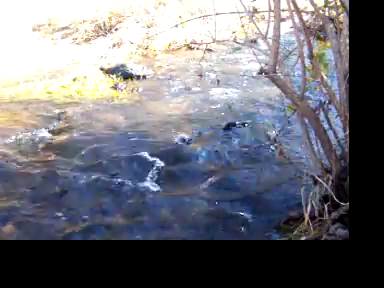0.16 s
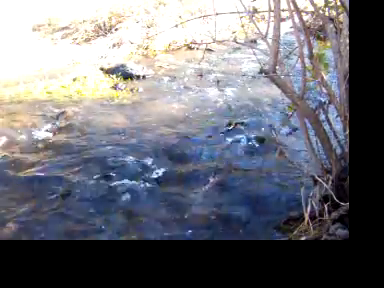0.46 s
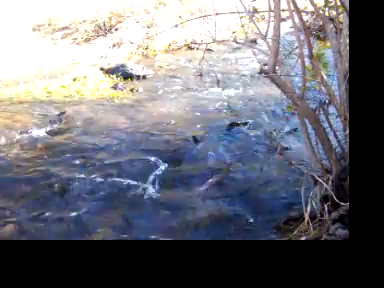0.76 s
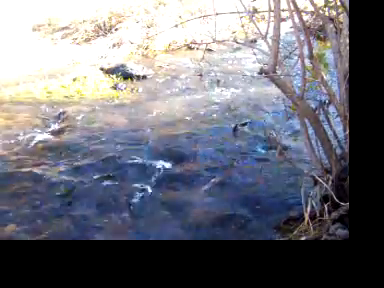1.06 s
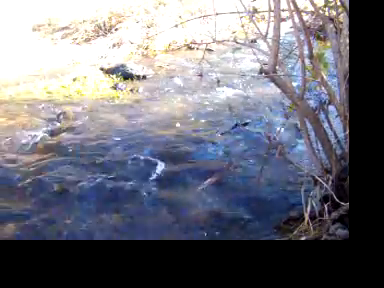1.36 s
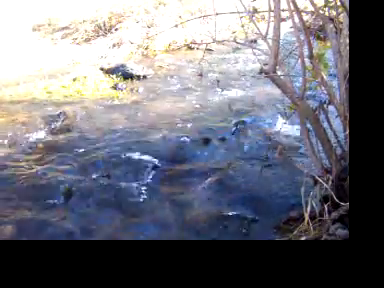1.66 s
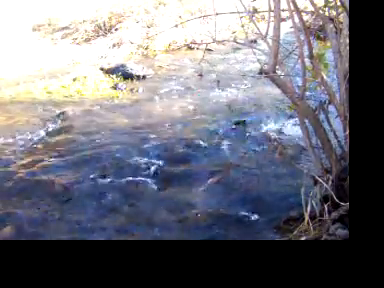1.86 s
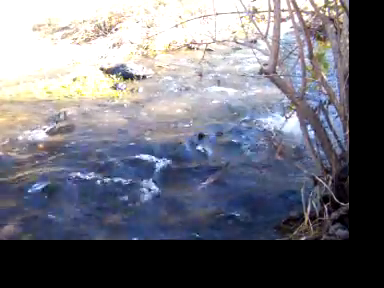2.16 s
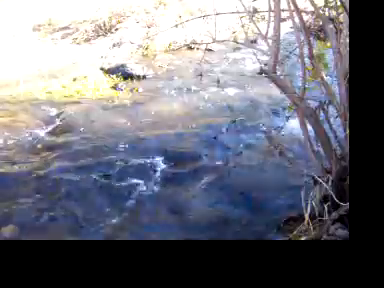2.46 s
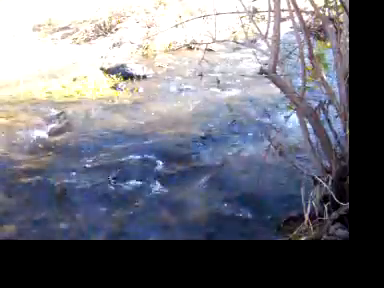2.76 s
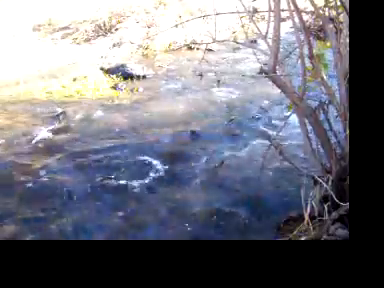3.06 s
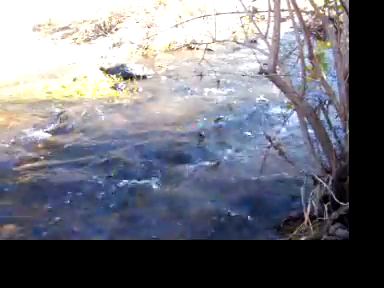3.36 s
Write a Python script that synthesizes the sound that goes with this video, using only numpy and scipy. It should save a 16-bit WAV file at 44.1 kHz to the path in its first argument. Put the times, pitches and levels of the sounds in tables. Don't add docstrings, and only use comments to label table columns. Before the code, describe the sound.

A shallow stream rushes steadily throughout, a dense fizz of tiny bubbles over a softer low wash, outdoors and very close. Until 1.3 s only fine spray ticks and a few chirps stand out. Small blips thicken around 1.5 s; a plop at 1.7 and a sharp tick at 1.8 lead to a deep plop and rising gulp at 1.9. Gurgles and plops continue to 2.6, then grow sparser; loud hits briefly duck the rush.

```python
import sys
import numpy as np
from scipy import signal
from scipy.fft import rfft, irfft
from scipy.io import wavfile
from scipy.ndimage import uniform_filter1d

SR = 44100
rng = np.random.default_rng(int(sys.argv[2]) if len(sys.argv) > 2 else 0)


def invert_db(level):
    return 10 ** (np.asarray(level, dtype=float) / 20)


def put_to_file(sound):
    columns = np.atleast_2d(sound).T
    safe = np.clip(columns, -1, 1)
    whole_steps = np.round(safe * 32767)
    wavfile.write(sys.argv[1], SR, whole_steps.astype(np.int16))


N = 154791

# f/Hz, level/dB
BODY_COLOUR = [(18, -16.5), (60, -10.5), (110, -6.5), (150, -9.5), (370, -6), (540, -6.5), (635, -1),
               (740, -8.5), (1050, -15), (1400, -29), (2300, -90)]
# f/Hz, level/dB
FIZZ_COLOUR = [(620, -21), (1050, -8.5), (1210, -3), (1560, -3), (2890, -4.5), (4940, -3), (7000, -7.5),
               (8080, -19), (8920, -36.5), (11600, -77.5), (19600, -120)]
# t/s, level/dB
STONE_CHURN = [(0.0, -23.5), (0.03, -24), (0.48, -24), (0.51, -21.5), (0.52, -25.5), (1.3, -24),
               (1.31, -22.5), (1.47, -24), (1.5, -22), (1.75, -22), (1.83, -13), (1.84, -20), (1.93, -21.5),
               (3.09, -21.5), (3.1, -23), (3.35, -19), (3.44, -25.5), (3.51, -18.5)]
# centre t/s, boost/dB, half length/s
SPLASH_SWELLS = [(1.326, 3, 0.013), (1.51, 5.5, 0.015), (1.562, 6, 0.0066), (1.619, 3, 0.012),
                 (1.718, 1.5, 0.013), (1.915, 8, 0.0099), (2.113, 5, 0.0086), (2.17, 2.5, 0.014),
                 (2.277, 4.5, 0.012), (2.412, 2.5, 0.017), (2.722, 3.5, 0.012), (3.078, 3.5, 0.014),
                 (3.335, 2, 0.025)]
# t/s, peak level/dB, f/Hz, ring/cycles
NEAR_SPRAY = [(0.1476, -11, 4220, 4), (0.1999, -9, 4380, 4), (0.3105, -12, 4800, 4), (0.4025, -10, 5330, 5),
              (0.4155, -11, 4200, 6), (0.4265, -13, 5700, 4), (0.4806, -9, 7000, 2), (0.5118, -11, 4700, 3),
              (0.5775, -13, 6500, 3), (0.6988, -10, 4270, 4), (0.839, -12, 4290, 4), (1.0128, -6, 4900, 4),
              (1.0145, -9, 4900, 5), (1.0545, -13, 4300, 4), (1.3075, -8, 6600, 4), (1.3362, -7, 6200, 4),
              (1.3987, -11, 3020, 3), (1.4135, -9, 6100, 4), (1.479, -11, 4910, 4), (1.4965, -9, 3890, 4),
              (1.6177, -11, 5010, 3), (1.7379, -12, 4470, 4), (1.9111, -10, 4730, 4),
              (2.0268, -11, 4420, 4), (2.1086, -11, 5270, 4), (2.1625, -12, 5940, 4),
              (2.5945, -11, 5600, 3), (2.9946, -12, 3350, 4), (3.3608, -9, 4300, 8), (3.364, -11, 3500, 7),
              (3.383, -12, 7200, 6), (3.457, -11, 4730, 4)]
# t/s, peak level/dB, f/Hz, ring/cycles, pitch rise/share
RISING_CHIRPS = [(0.349, -12, 4700, 24, .06), (1.506, -14, 1400, 9, .12), (1.527, -13, 1300, 9, .14),
                 (1.540, -15, 2500, 10, .12), (1.565, -16, 1950, 7, .05), (1.594, -17, 1600, 8, .06),
                 (1.604, -17, 1550, 10, .03), (1.621, -15, 2800, 12, .06), (1.630, -20, 2100, 12, .1),
                 (1.704, -16, 2300, 16, .1), (1.478, -20, 1900, 8, .03), (1.020, -15, 3100, 9, .06),
                 (1.3695, -15, 2000, 8, .04), (1.339, -14, 3300, 12, .15), (2.410, -7, 3150, 14, .02),
                 (2.103, -14, 520, 7, .14)]
# t/s, peak level/dB, f/Hz, ring/cycles
MIDDLE_BUBBLES = [(0.4804, -15.5, 1910, 7.1), (1.308, -16, 1990, 6.0), (1.3662, -7, 2600, 2.6),
                  (1.5115, -11, 1700, 4), (1.6192, -13, 1830, 4.2), (1.698, -15, 1550, 4.6),
                  (2.0198, -18, 1930, 5.2), (2.0523, -9.5, 1417, 4.8), (2.2662, -10, 2010, 1.8),
                  (2.623, -19, 1570, 6.0), (2.718, -13, 1330, 4.5), (2.783, -15, 1580, 6.0),
                  (2.9047, -13, 1480, 6.0), (3.259, -11.5, 1890, 7), (3.313, -15, 1710, 6.0)]
# t/s, peak level/dB, f/Hz, ring/cycles
DROPLETS = [(0.4806, -8, 4000, 1.8), (0.5077, -7, 6420, 4.2), (0.5075, -4.5, 4970, 3.8),
            (1.0096, -9, 5600, 5), (1.0507, -5.5, 4370, 4.2), (1.1746, -9.5, 3460, 4.2),
            (1.3362, -13, 2600, 3), (1.56, -12, 4840, 4.2), (1.7774, -11.5, 4320, 3.8),
            (1.7923, -5, 4570, 4.2), (1.8228, 5.5, 6210, 4.8), (1.8585, -8, 2780, 4.2),
            (2.2687, -8, 4660, 3.9), (2.2957, -9, 4220, 4.7), (2.6359, -9, 6380, 4.2),
            (2.6452, -1, 5600, 1.8), (3.03, -11.5, 4950, 4.2), (3.0667, -9, 5070, 4.2),
            (3.1857, -11, 4740, 4.2), (3.2926, -9, 4600, 2.5)]
# t/s, peak level/dB, f/Hz, ring/cycles, pitch rise/share
LARGE_POCKETS = [(0.881, -21.5, 302, 8.1, 0.035), (1.398, -19, 694, 2.1, .02),
                 (1.523, -19.5, 760, 5.9, .02), (1.714, -2.5, 660, 3, 0.016), (1.732, -13, 520, 6, 0.035),
                 (1.744, -12.5, 660, 9, 0.01), (1.907, -1, 330, 2.3, -0.024), (1.922, -12.5, 650, 13, .03),
                 (1.901, -14, 605, 4.4, .02), (2.065, -11, 445, 3.5, 0.0032), (2.086, -5.5, 390, 2.5, -.02),
                 (2.108, -13, 650, 5, 0.072), (2.123, -13.5, 640, 7, 0.06), (2.155, -13.5, 420, 6, -0.011),
                 (2.263, -16, 313, 2.6, 0.0053), (2.388, -14, 630, 6, 0.073),
                 (2.423, -7.5, 406, 3.5, 0.032), (2.602, -4.5, 370, 3.3, -0.0086),
                 (2.858, -18, 588, 9.8, .04), (2.948, -15, 600, 3.7, 0.0106),
                 (2.983, -18.5, 237.5, 6.8, 0.0094), (3.190, -14, 661, 9, 0.001), (3.275, -16, 700, 7, .01),
                 (3.472, -12.5, 790, 14, 0.054)]
# t/s, peak level/dB, f/Hz, ring/cycles
TRAILING_GURGLES = [(1.773, -22, 622, 8.6), (2.098, -15, 470, 3), (1.914, -10, 620, 6),
                    (1.963, -17, 270, 5), (1.955, -20, 820, 8), (1.925, -19, 460, 6), (2.190, -18, 660, 5),
                    (2.146, -22, 720, 9), (2.078, -18, 330, 3), (2.016, -21, 450, 5), (2.372, -16, 480, 4),
                    (2.355, -17.5, 660, 6), (2.29, -17, 190, 2), (1.560, -15, 2660, 3.3),
                    (1.867, -21, 776, 5), (1.814, -18, 700, 5.4), (2.099, -15, 230, 2.2),
                    (2.176, -16, 470, 3), (2.178, -19, 250, 4), (2.281, -18, 592, 6),
                    (2.286, -24.5, 167, 1.3), (2.438, -15, 630, 1.5), (2.471, -18, 444, 3.9),
                    (2.492, -22, 339, 3), (2.510, -18.5, 448, 6), (2.525, -21, 630, 6),
                    (2.622, -15, 373, 2.8), (2.755, -19, 600, 9.9), (2.900, -18.5, 679, 8.9),
                    (3.100, -23, 722, 15), (3.222, -22, 434, 6.7), (3.469, -16, 900, 4),
                    (2.731, -11.5, 1480, 7), (2.870, -17, 1760, 10), (3.345, -16, 1470, 9),
                    (1.6425, -12.5, 1560, 5.1)]

SMALL_RISE = 0.031
GULP_S = 1.926


def evened(x):
    return x / np.sqrt(np.mean(x ** 2) + 1e-20)


def colour(x, points):
    z = rfft(x)
    hz = np.fft.rfftfreq(len(x), 1 / SR)
    f, db = np.transpose(points)
    flat = np.sqrt(uniform_filter1d(abs(z) ** 2, size=201)) + 1e-9
    shape = invert_db(np.interp(np.log(hz + 1), np.log(f + 1), db, -90, -90))
    return evened(irfft(z / flat * shape, len(x)))


def flicker(per_s):
    smooth = uniform_filter1d(rng.standard_normal(N), int(SR / per_s))
    return evened(uniform_filter1d(smooth, int(SR / per_s / 2)))


def bubble(hz, cycles, rise):
    cycles = max(cycles, 0.4)
    u = np.arange(0, 2.5 * cycles / hz, 1 / SR) * hz / cycles * 2
    swell = (u * np.exp(1 - u)) ** 1.42
    pitch = np.minimum(hz * (1 + rise * (u - 1)), SR / 3)
    return swell * np.sin(2 * np.pi * np.cumsum(pitch) / SR)


def add(mix, s, sound):
    part = mix[round(s * SR):][:len(sound)]
    part += sound[:len(part)]


def bubbles(events, trim_db, stretch):
    layer = np.zeros(N)
    for s, db, hz, cycles, *own_rise in events:
        rise = own_rise[0] if own_rise else SMALL_RISE
        add(layer, s, invert_db(db + trim_db) * bubble(hz, cycles * stretch, rise))
    return layer


def cloud(lo_hz, hi_hz, per_s, spread_db, cycles, rise, clump_db, count):
    clumps = invert_db(clump_db * flicker(49.0))
    out = np.zeros(N)
    for hz in np.geomspace(lo_hz, hi_hz, count):
        popping = rng.random(N) < per_s / count / SR
        size_db = spread_db * np.minimum(rng.exponential(1, N), 5)
        sign = rng.choice([-1., 1.], N)
        pops = popping * invert_db(size_db) * sign
        out += signal.oaconvolve(pops * clumps, bubble(hz, cycles, rise))[:N] * np.sqrt(hz)
    return evened(out)


def rush():
    seconds = np.arange(N) / SR
    t, db = np.transpose(STONE_CHURN)
    churn_db = np.interp(seconds, t, db) + 24.5
    splash_db = sum(db * np.exp(-((seconds - s) / half) ** 2) for s, db, half in SPLASH_SWELLS)

    low = cloud(150, 1050, 400, 2.2, 5.5, .02, .8, count=16)
    low = low + invert_db(-6.5) * rng.standard_normal(N)
    low = low + invert_db(1.5) * colour(rng.standard_normal(N), BODY_COLOUR)

    high = cloud(1050, 6137, 2500, 1.94, 6.87, 0.022, 0.38, count=24)
    high = high + invert_db(4.0) * rng.standard_normal(N)
    high = high + invert_db(-2.0) * cloud(4450, 9160, 900, 1.9, 2.4, .02, 3.0, count=8)
    high = high + invert_db(-4.5) * cloud(7600, 9400, 600, 3.3, 4.5, .01, 4.5, count=4)

    body = invert_db(-27.5 + 0.19 * churn_db) * colour(low, BODY_COLOUR)
    fizz = invert_db(-25.2 + 0.67 * churn_db + splash_db) * colour(high, FIZZ_COLOUR)
    return body + fizz


def spray():
    return bubbles(NEAR_SPRAY, -4.0, 0.9)


def chirps():
    return bubbles(RISING_CHIRPS, -5.0, 0.85)


def middle_bubbles():
    return bubbles(MIDDLE_BUBBLES, -3.0, 1.4)


def droplets():
    return bubbles(DROPLETS, -3.0, 1.4)


def plops():
    return bubbles(LARGE_POCKETS, -2.5, 1.09)


def gurgles():
    return bubbles(TRAILING_GURGLES, -1.5, 0.92)


def gulp():
    length_s, start_hz, end_hz, bend = .061, 180, 560, 3.7
    u = np.arange(0, length_s, 1 / SR) / length_s
    turn = 2 * np.pi * np.cumsum(start_hz + (end_hz - start_hz) * u ** bend) / SR
    fades = np.minimum(1, np.minimum(u / 0.12, (1 - u) / 0.07))
    level = invert_db(-12.5 + 1.5 * (u - .5)) * fades
    return level * (np.sin(turn) + invert_db(-22) * np.sin(2 * turn))


def scene():
    small = spray() + middle_bubbles() + droplets()
    big = chirps() + plops() + gurgles()
    add(big, GULP_S, gulp())
    wobble = invert_db(1.6 * flicker(220.))
    return (rush() + small + big * wobble)[None]


def ground_reflection(x):
    notch_hz, width_hz = 1068, 53
    notched = signal.lfilter(*signal.iirnotch(notch_hz, notch_hz / width_hz, SR), x)
    return notched * 0.44 + x * 0.54


def limiter(x):
    peak_db = 20 * np.log10(abs(x[0]) + 1e-9)
    fall = np.arange(N) * 156.0 / SR
    over_db = np.maximum(np.maximum.accumulate(peak_db + fall) - fall + 8.5, 0)
    held = uniform_filter1d(np.roll(over_db, round(0.0011 * SR)), size=45)
    return x / invert_db(.75 * held)


def low_pass(x):
    return signal.sosfilt(signal.butter(12, 9070, fs=SR, output="sos"), x)


def record(dry):
    x = limiter(ground_reflection(dry))
    x = x / (1 + (x / invert_db(-2.2)) ** 4) ** .25
    band_limit = signal.firwin(161, 8960, window=("kaiser", 9), fs=SR)
    x = signal.oaconvolve(x, band_limit[None], "same")
    return low_pass(x)


dry = scene()
out = record(dry)
put_to_file(out)
```